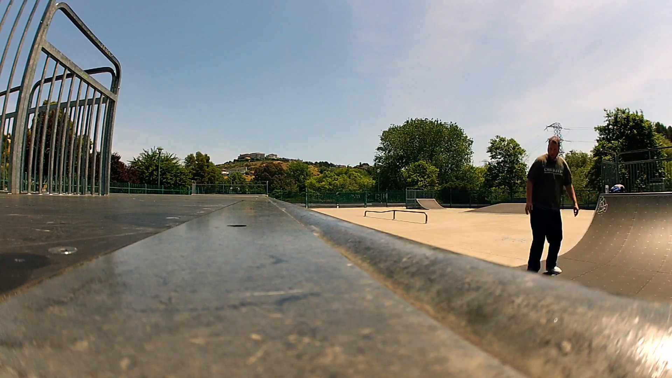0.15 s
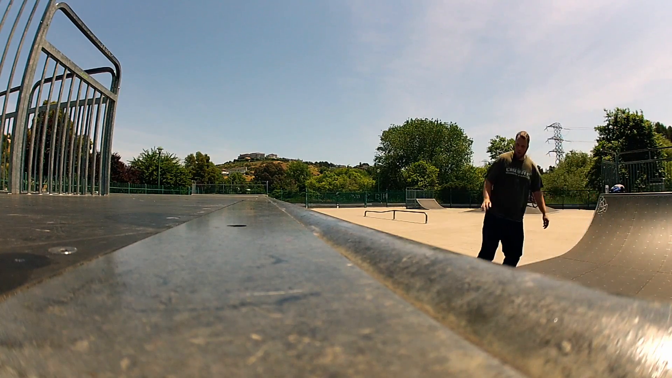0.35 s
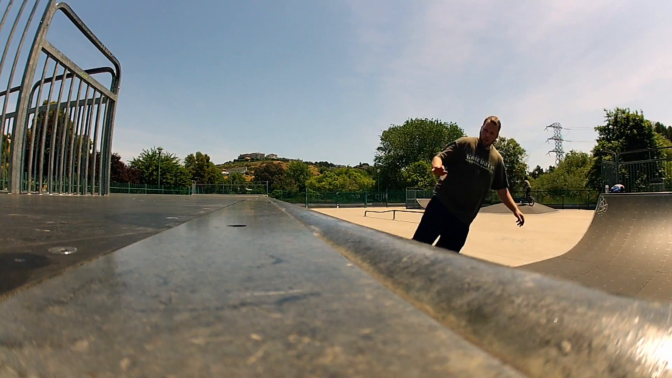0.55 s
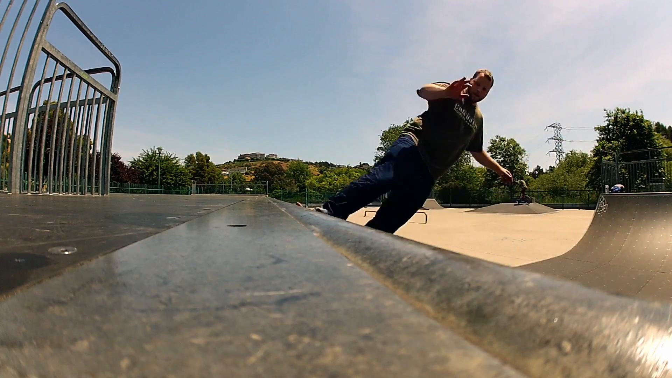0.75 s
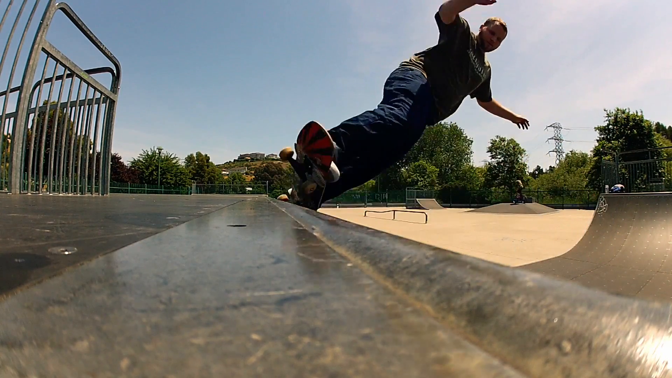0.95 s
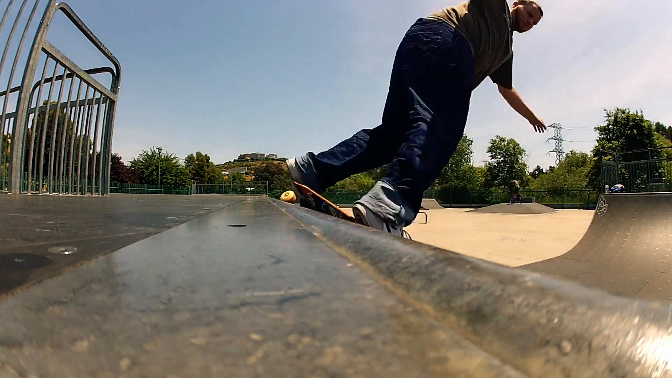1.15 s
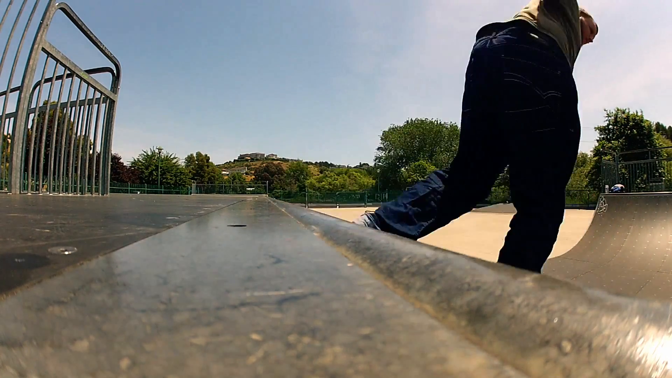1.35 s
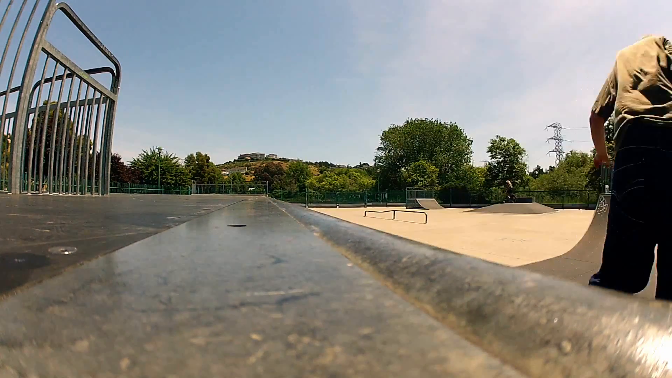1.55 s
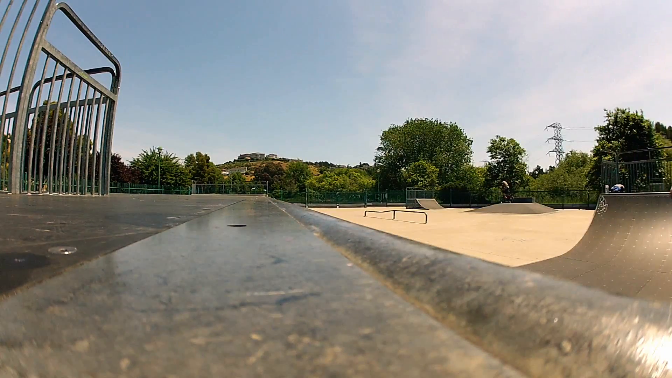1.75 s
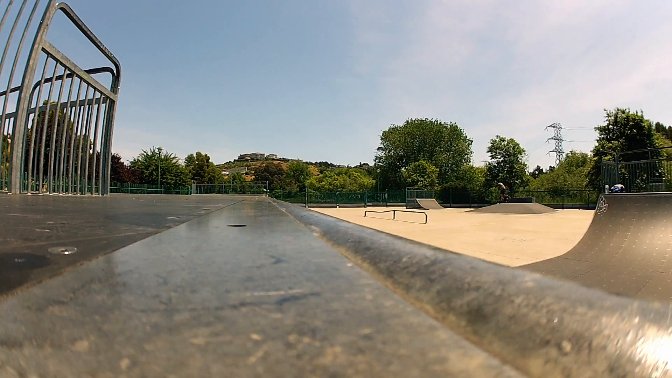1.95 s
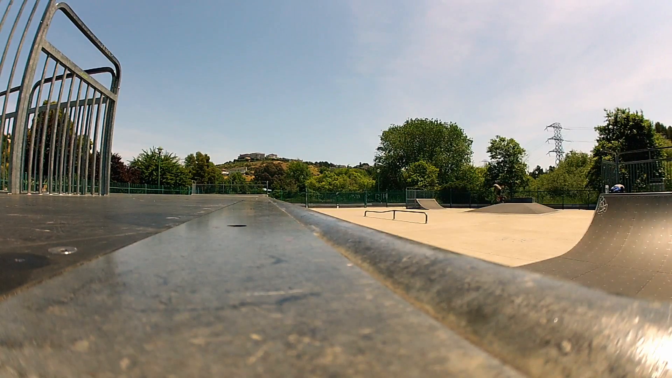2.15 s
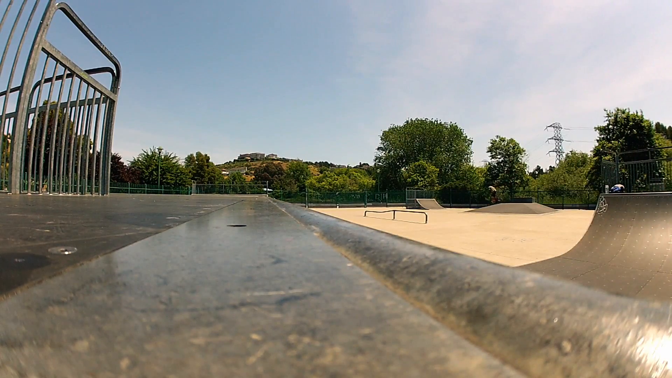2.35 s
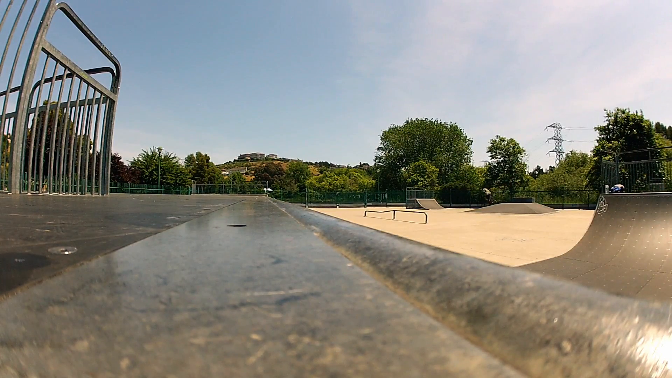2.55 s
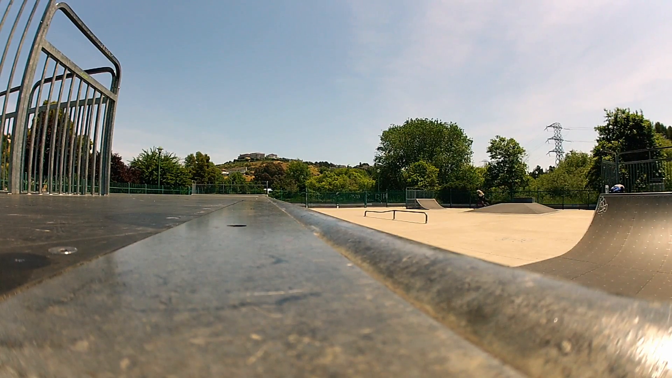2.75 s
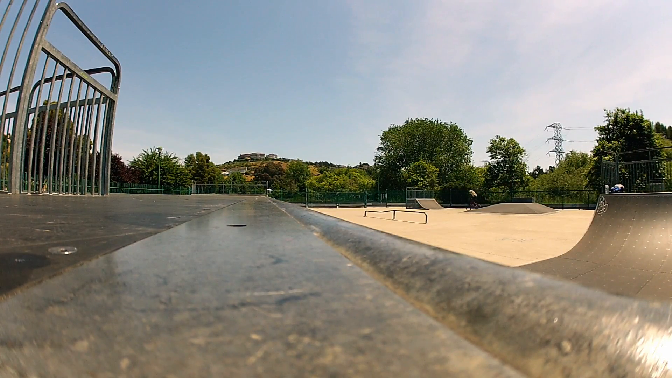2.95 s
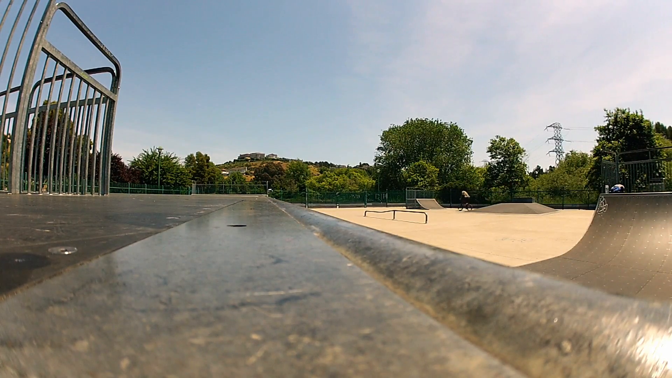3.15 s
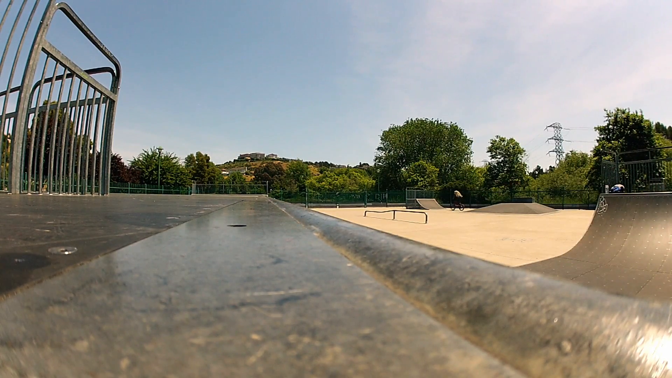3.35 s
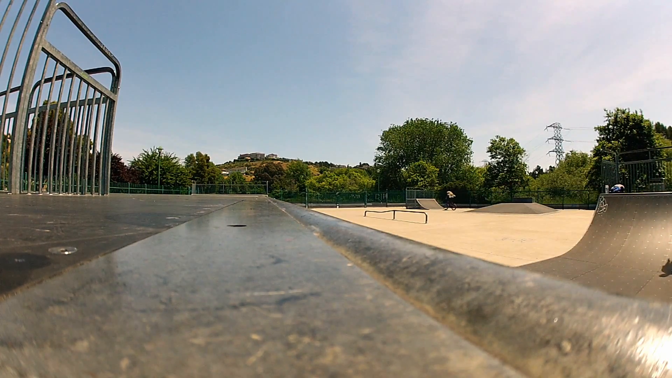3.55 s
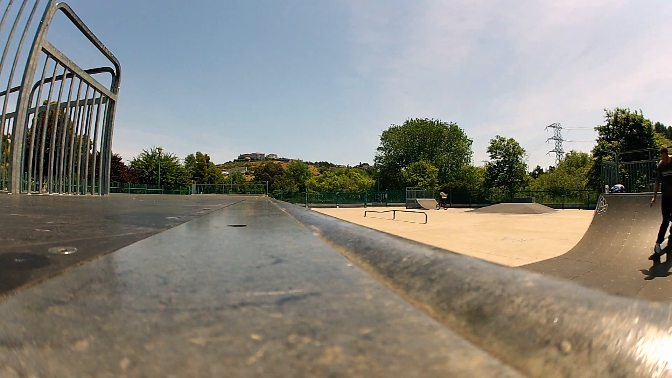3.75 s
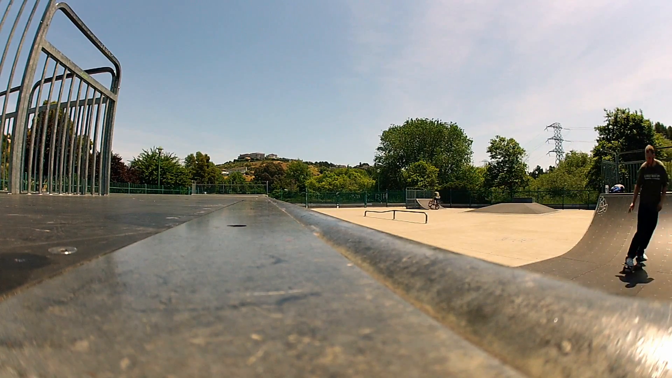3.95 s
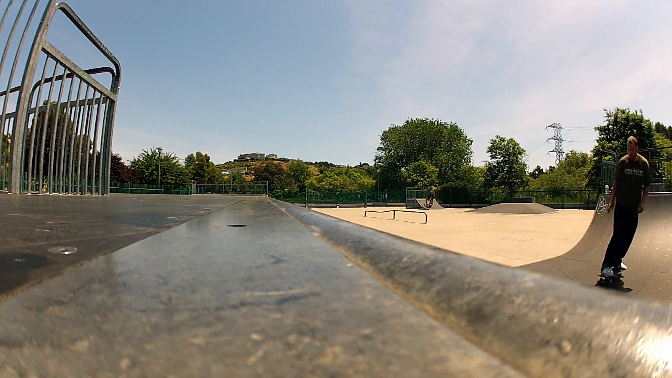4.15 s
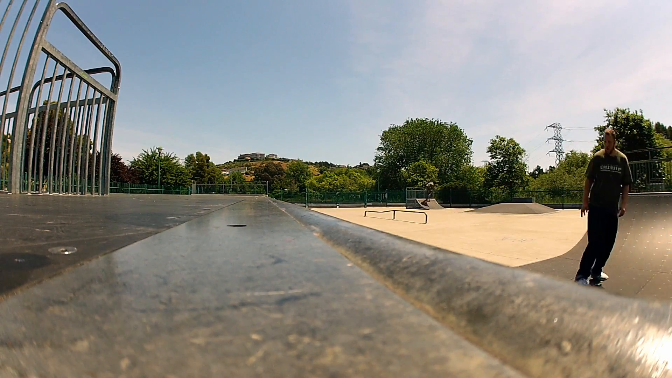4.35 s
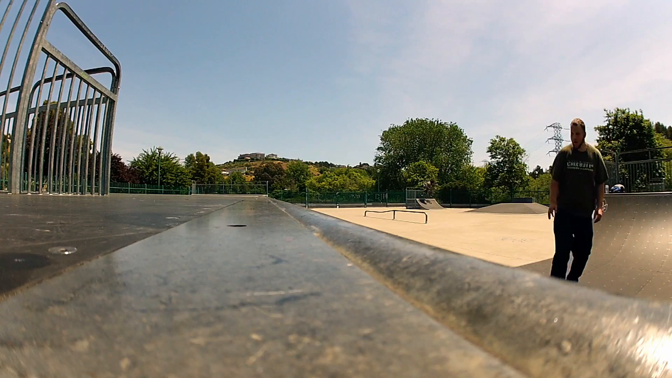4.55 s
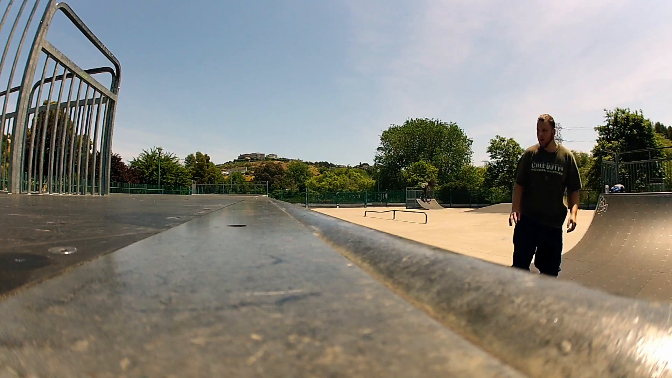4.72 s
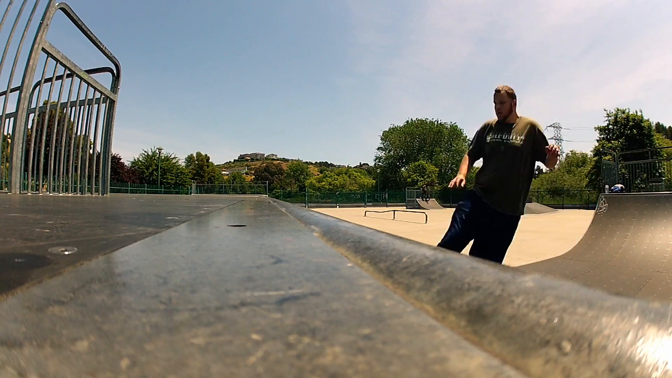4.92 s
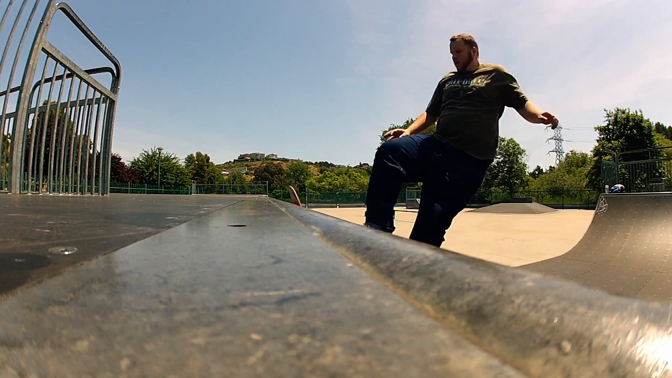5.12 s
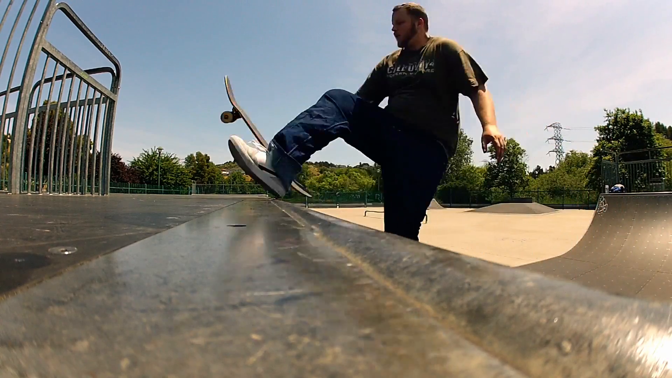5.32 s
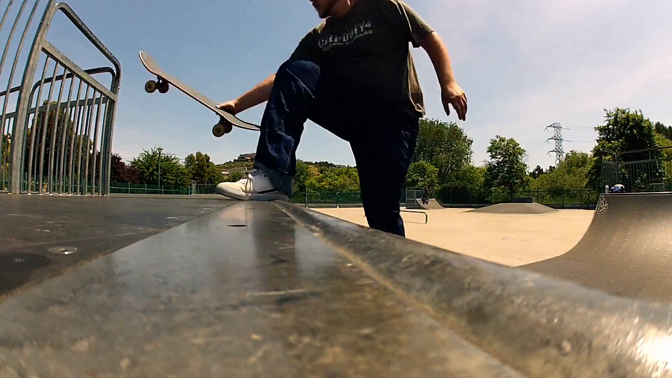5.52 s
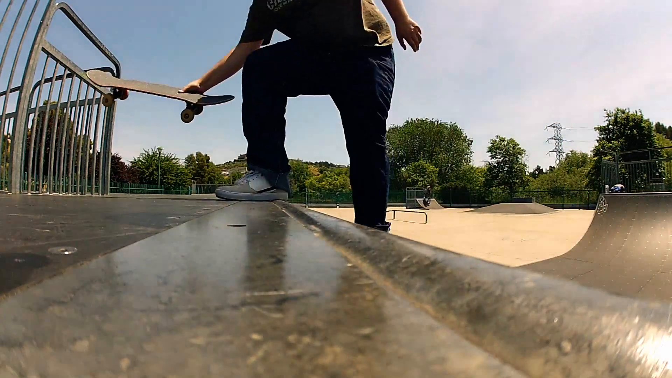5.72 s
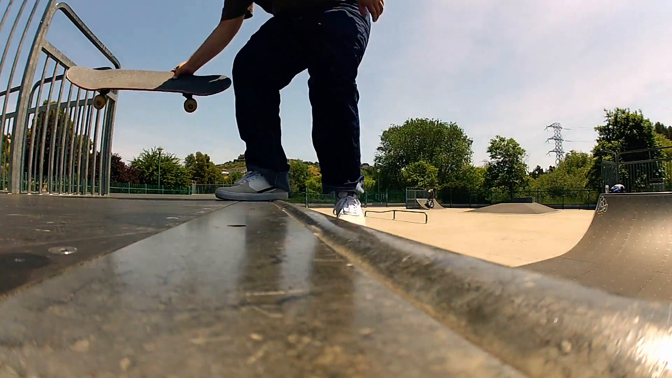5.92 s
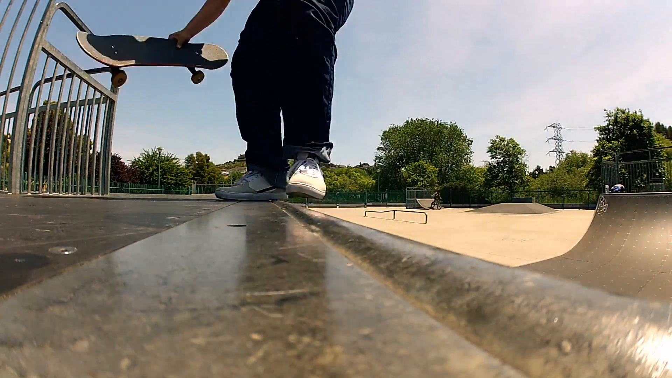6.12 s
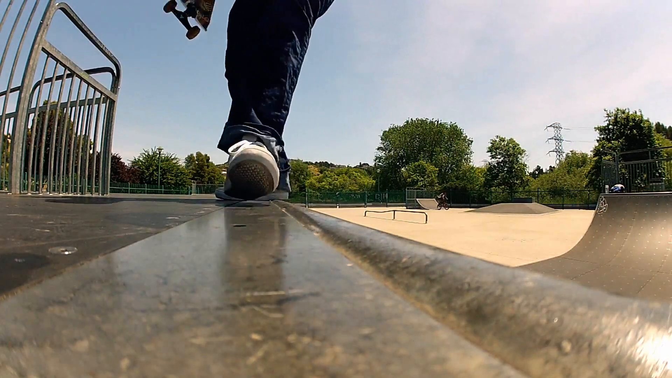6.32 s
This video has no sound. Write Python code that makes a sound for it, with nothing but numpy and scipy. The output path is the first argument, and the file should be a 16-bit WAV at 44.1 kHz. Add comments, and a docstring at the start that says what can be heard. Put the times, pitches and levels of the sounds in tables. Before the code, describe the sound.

A skateboard on hollow ramps outdoors, heard from a microphone lying on the platform, so the panels boom and loud blows distort dully. Wheels rumble and roar from the start; two sharp clacks hit at 0.5-0.6 s, then a cluster of deep thuds around 0.7-0.9. The coping turn brings grinding scuffs and rapid wooden judder near 1.0-1.2, followed by deck knocks and a hollow stamp at 1.3-1.4. The roll away swells at 1.6-1.8, with seam clacks near 2.0, 2.7 and 3.0, thinning to faint grit and small clacks by 3.4. From 3.8 the rumble returns, with clacks near 4.1 and a bright steel-edged pair at 4.8-4.9. At 5.25 the tail cracks and squeaks; heavy stamps and a wooden judder run to 5.5. Softer steps at 5.7 and 5.9 and sole scrapes at 6.2 remain over low open-air murmur.

```python
"""Skateboard on hollow park ramps

The microphone lies on a ramp's platform outdoors; the board passes close by, rolls off to 7 m and returns.
Shaped noise and wandering resonances make the rolling: panels drum and boom, wheels roar, grit hisses.
Decaying modes and noise bursts make the blows: clacks at seams, knocks of the deck, stamps on the platform.
Friction tones mark the slides and turns on the steel coping. The recorder overloads and holds its samples
at a low rate."""
import sys
import numpy as np
from scipy import signal
from scipy.fft import rfft, irfft, next_fast_len
from scipy.io import wavfile

SR = 44100
rng = np.random.default_rng(int(sys.argv[2]) if len(sys.argv) > 2 else 0)


def dump_mix(stems):
    """Bounce the given channels to the path in sys.argv[1] as a 16-bit WAV at rate SR."""
    frames = np.atleast_2d(stems).T  # one column per channel
    limited = np.clip(frames, -1, 1)  # hard clip at full scale
    pcm = np.round(limited * 32767).astype(np.int16)
    wavfile.write(sys.argv[1], SR, pcm)


N = 281161
TIME = np.arange(N) / SR
AGE = TIME[:SR // 2]   # time since a blow

# how hard the wheels roll (speed and load) on three rides: (time [s], level [dB])
RIDE_UP = [(0, -35), (0.2, -41), (0.45, -39), (0.72, -37), (0.88, -40), (1.02, -47.5), (1.27, -53.5)]
# the second ride: (time [s], level [dB])
RIDE_AWAY = [(1.33, -42.5), (1.8, -34), (2.1, -40), (2.42, -42), (2.68, -38.5), (2.92, -47), (3.08, -45.5),
             (3.25, -57.5)]
# the third ride: (time [s], level [dB])
RIDE_BACK = [(3.55, -57.5), (3.85, -42), (4.15, -38.5), (4.45, -43), (4.56, -39.5), (4.78, -44.5),
             (4.87, -38.5), (5.1, -42.5), (5.21, -46)]
# from the board to the microphone: (time [s], distance [m])
DISTANCE = [(0, 4.06), (0.55, 2.2), (1.2, 2.8), (1.6, 2.3), (2.0, 2.1), (2.7, 5.8), (3.85, 7), (4.55, 2.7),
            (5.1, 1.9), (5.6, 1.4), (6.38, 1.2)]
# the rider presses into the curve of a ramp and the panel booms:
# (time [s], level [dB], half length [s], pitch [Hz])
PUMPS = [(0.04, -33, 0.057, 185), (0.78, -41, 0.089, 105), (0.705, -34, 0.0081, 280),
         (0.805, -43, 0.037, 154.8), (0.875, -37, 0.038, 230), (1.62, -34.5, 0.08, 195),
         (1.715, -30, 0.013, 205), (2.645, -36, 0.014, 128.5), (2.76, -41, 0.093, 185),
         (3.07, -44, 0.11, 169.4), (3.45, -41, 0.042, 125), (4.695, -39, 0.069, 180),
         (5.065, -42.5, 0.043, 384)]
# wheels or soles slide sideways, levels at the microphone:
# (time [s], half length [s], grind level [dB], hiss level [dB])
SLIDES = [(0.7, 0.018, -54, -87), (0.96, 0.13, -61, -76), (1.13, 0.082, -59.5, -83),
          (1.71, 0.054, -66, -68), (2.822, 0.1, -72, -74.5), (3.04, 0.048, -67, -71.5),
          (3.27, .045, -87, -78.5), (3.396, 0.042, -73, -68), (3.548, 0.022, -76, -71.5),
          (3.674, 0.05, -74, -74), (3.823, 0.042, -86, -69), (4.02, 0.095, -62, -80),
          (4.448, 0.21, -85, -75.5), (5.085, 0.02, -53, -71), (5.527, 0.051, -59.5, -74),
          (5.635, 0.02, -66, -70), (6.192, 0.12, -66.5, -82.5)]
# an axle crosses a panel seam, front and rear in turn: (time [s], thud level [dB], thud pitch [Hz],
# thud t60 [s], snap level [dB], clatter level [dB], clatter t60 [s], crunch of grit level [dB])
SEAMS = [(0.5055, -25, 524, 0.031, -20, -36, 0.098, -61), (0.5763, -17, 326, 0.009, -23.5, -28, 0.025, -63),
         (1.944, -32, 670, 0.008, -33, -32.5, 0.074, -65), (2.029, -30, 370, 0.055, -33, -37, 0.062, -55),
         (2.62, -30.5, 434, 0.022, -53, -47, 0.04, -57), (2.699, -21.5, 322, 0.046, -55, -45, .04, -57),
         (2.979, -26, 177, 0.061, -45, -45.5, 0.039, -56), (3.082, -32, 251, 0.046, -52, -46, 0.059, -64),
         (3.38, -33, 283, 0.027, -30, -40, 0.031, -60), (3.406, -26.5, 263, 0.015, -40, -43, 0.038, -55),
         (4.058, -28.5, 405, 0.053, -41, -39, 0.074, -57),
         (4.149, -45, 442, 0.019, -32.5, -34.5, 0.065, -58),
         (4.8215, -25, 362, 0.074, -40, -30.5, 0.032, -58),
         (4.9111, -21, 380, 0.017, -22.5, -28, 0.027, -52)]
# a wheel drops into a dent of the panel: (time [s], thud level [dB], thud pitch [Hz], thud t60 [s])
DENTS = [(0.513, -40, 327, 0.026), (0.696, -31, 284, 0.052), (0.704, -26, 320, 0.034),
         (0.721, -26.5, 377, 0.025), (0.753, -22.5, 196, 0.038), (0.872, -35, 232, 0.12),
         (1.568, -27, 210, 0.032), (1.707, -26.5, 221, 0.075), (1.757, -39, 594, 0.02),
         (1.796, -32, 323, 0.035), (2.146, -30.5, 345, 0.04), (2.641, -26, 340, 0.04),
         (2.648, -27, 198, 0.021), (2.774, -28, 208, 0.065), (2.967, -41.5, 542, 0.08),
         (3.824, -40, 565, 0.035), (3.902, -39, 605, 0.017), (3.975, -37.5, 615, 0.019),
         (4.299, -31, 328, 0.041)]
# a grain of grit is crushed under a wheel: (time [s], level [dB])
GRIT_POPS = [(1.188, -68), (1.495, -60), (1.64, -52.5), (1.907, -53), (2.935, -53), (2.963, -53),
             (3.025, -59), (3.447, -57), (3.474, -72), (4.029, -66), (5.6, -59.5), (5.757, -69),
             (6.152, -69), (6.186, -74)]
# axles tap the loose steel edge of the last seam: (time [s], reference level of its sounds [dB])
STEEL_TAPS = [(4.821, -39), (4.9113, -37)]
# the board lands on its wheels or knocks its tail: (time [s], thud level [dB], thud pitch [Hz],
# snap level [dB], wood crack level [dB], deck ring level [dB], deck mode [Hz])
KNOCKS = [(1.187, -56, 302, -53, -47, -35.5, 995), (1.3102, -26, 450, -54, -36, -32.5, 1400),
          (1.358, -27.5, 320, -52, -38, -38.5, 1500), (1.39, -21, 326, -24.5, -37.5, -31, 890),
          (5.223, -41, 328, -50, -43, -43, 960), (5.229, -33, 337, -54, -47, -43, 1150),
          (5.246, -26.5, 504, -44, -35, -50, 1200), (5.405, -26, 298, -42, -31, -34.5, 1440)]
# the deck slips over the coping in quick series: (time [s], level [dB], mean gap between slips [s],
# loss per slip [dB], middling pitch [Hz])
JUDDERS = [(1.051, -51, 0.0016, -0.5, 1700), (1.077, -43.5, 0.0021, 0, 1330), (1.152, -46, 0.0018, 4, 1500),
           (1.16, -40, 0.0014, 1.5, 1370), (5.4055, -23.5, .0019, 4.5, 1140)]
# trucks, wheels and tail scuff the coping:
# (time [s], rub level [dB], length [s], ring pitch [Hz], ring level [dB])
SCUFFS = [(0.868, -38, 0.016, 3404, -48.5), (0.955, -34, 0.011, 2680, -51), (1.062, -58, 0.02, 4850, -67),
          (1.11, -55.5, 0.059, 2170, -63), (1.151, -57.5, 0.02, 4830, -63), (1.225, -56, 0.033, 4800, -68),
          (1.37, -62, 0.027, 4380, -65), (2.959, -57, 0.016, 1400, -61), (5.244, -34, 0.0089, 4850, -53),
          (5.264, -41, 0.013, 5230, -52), (5.402, -44, 0.012, 2680, -58)]
# the tail squeaks as it drags on the steel, its pitch following the pressure:
# (time [s], level [dB], length [s], start pitch [Hz], end pitch [Hz], octave against the tone [dB])
SQUEAKS = [(5.263, -51.5, 0.031, 2350, 2880, -0.5), (5.405, -53.5, 0.024, 2730, 2620, -16)]
# feet on the hollow platform: (time [s], level [dB], time for the sole to take the weight [s])
STAMPS = [(1.392, -20, 0.00072), (5.247, -16.5, 0.00049), (5.29, -21, 0.0081), (5.336, -23, 0.0098),
          (5.384, -18.5, 0.0084), (5.464, -24, 0.0077), (5.7, -37.5, 0.0082), (5.889, -45, .005)]
# a sole shifts on the platform: (time [s], level [dB])
SHUFFLES = [(5.451, -46), (5.475, -47), (5.533, -49), (5.628, -55), (6.157, -54.5), (6.223, -62),
            (6.254, -56.5)]

# modes of a ramp panel: (pitch [Hz], relative level [dB], t60 [s])
PANEL = [(145, -6, 0.071), (205, -12, 0.049), (338, -6, 0.16), (467, -20, 0.12), (592, -10.5, 0.069)]
# modes of the hollow platform: (pitch [Hz], relative level [dB], t60 [s])
PLATFORM = [(119.9, -20, 0.77), (149.4, -7, 0.097), (283.4, -10.5, 0.086), (400, -19, 0.06)]
# modes of the loose steel edge: (pitch [Hz], relative level [dB], t60 [s])
STEEL = [(3350, 34, 0.0089), (3510, 32, 0.018), (3660, 18, 0.0066), (4320, 14, .006)]

# spectrum of the drumming panels: (frequency [Hz], relative density [dB per Hz])
DRUM = [(20, -28), (45, -37), (65, -20), (100, -3), (150, -4), (195, -2.5), (235, -3), (300, -13.5),
        (500, -46)]
# spectrum of the wheels' roar: (frequency [Hz], relative density [dB per Hz])
ROAR = [(130, -8), (230, -4.5), (275, -2), (335, 1), (420, -3), (580, -11), (800, -23.5), (1200, -52),
        (2000, -59)]
# spectrum of wheels or soles grinding on the surface: (frequency [Hz], relative density [dB per Hz])
GRIND = [(400, -12), (750, 1), (1000, 2), (1350, -1.5), (1900, -9.5), (2500, -21), (3500, -25)]
# spectrum of loose grit hissing: (frequency [Hz], relative density [dB per Hz])
GRIT = [(1200, -35.5), (2300, -2.5), (2900, 3), (3600, 0.5), (4500, -1), (5600, 4)]
# spectrum of grit crushed under a wheel: (frequency [Hz], relative density [dB per Hz])
CRUNCH = [(1200, -8), (2400, -1.5), (3600, 2), (4600, -2), (5500, -10)]
# spectrum of clattering trucks and slapping soles: (frequency [Hz], relative density [dB per Hz])
CLACK = [(250, 0.5), (550, 15.5), (900, 7.5), (1200, 9), (2000, 1), (2800, -12), (4000, -17), (5500, -32.5)]
# spectrum of the loose steel edge rattling: (frequency [Hz], relative density [dB per Hz])
RATTLE = [(1500, -1), (2600, -1.5), (3500, 14), (4300, 0), (5200, -18)]
# spectrum of the wooden deck cracking: (frequency [Hz], relative density [dB per Hz])
WOOD = [(250, 4), (650, 17), (900, 10), (1400, 6), (1750, 3.5), (2200, -4.5), (2800, -26), (3500, -16),
        (4700, -9.5), (5600, -6.5)]
# spectrum of rubbing on the steel coping: (frequency [Hz], relative density [dB per Hz])
COPING = [(400, -4), (1000, -8), (1600, 7), (2200, 4), (2700, -5), (3400, -2), (4300, 0), (5150, -4.5),
          (5800, 12.5)]
# spectrum of the open air around: (frequency [Hz], relative density [dB per Hz])
PARK = [(20, -6), (60, 3), (110, 6), (160, 7), (240, -18.5), (450, -18), (1000, -28), (2000, -32.5),
        (3000, -47), (5500, -47.5)]

CRUISE_DB = -41.5   # a ride at ordinary speed
KICK_S, SPIN_DOWN_DB_PER_S = 5.24, 22   # the board is kicked up and its wheels run down
# carried by the ramp, alike at any distance: levels at cruise
DRUM_DB, BOOM_DB, ROAR_DB, DECK_DB = -44, -44.5, -44, -51
DRUM_FOLLOWS = 0.65   # share of the ride's swing in dB that drumming and boom follow
# carried by the air, falling with distance: levels at cruise from 1 m
GRIND_DB, GRIT_DB, RATTLES_DB = -53, -72, -60.5
RATTLES_PER_S = 35
BOOM_HZ, BOOM_HZ_PER_DB = 181.15, 1   # the panel's boom rises with speed
BOOM_WANDER_HZ = 9   # and wanders as the wheels move over the panel
PUMP_DRUM_DB = -7   # broad drumming against the boom of a press
STIFF_S, STIFF_HALF_S, STIFF_DB = 4.23, 0.6, -4.5   # the way back starts over stiffer panels, which drum less
DECK_HZ, DECK_WANDER_HZ = 333.2, 16   # the deck's hum shifts as the rider's weight moves
SURGE_DB, SURGES_PER_S = 1.97, 13   # rough and smooth patches pass under the wheels
PITS_PER_S, PITS_DB, PIT_T60_S = 290, -54.5, 0.024   # level at cruise
PIT_LOW_HZ, PIT_HIGH_HZ = 425, 727
GRIT_FLUTTER_DB = 2.0
PANEL_RING_DB = -21   # the panel's other modes, against the thud
SHUDDER_DB, SHUDDER_FOLLOWS, SHUDDER_T60_S = -38.5, 0.38, 0.32   # level for a 0 dB thud; dB per dB of thud
CRUNCH_T60_S = 0.017
REBOUND_S, REBOUND_DB = .0035, 1.5   # second tap of the steel edge, against its reference level
KNOCK_T60_S, KNOCK_THUD_T60_S, DECK_RING_T60_S = 0.063, 0.025, 0.023
SLIP_T60_S = 0.0093
SCUFF_GRAINS_PER_S = 4300   # catches of a sliding surface
PIPE_RING_DB, PIPE_T60_S, PIPE_WIDTH_HZ = -19, 0.35, 500   # level against the ring
PARK_DB = -50.5
OVERLOAD = .0895   # clipping point, full scale 1
BASS_CUT_HZ, ANTI_ALIAS_HZ, HOLD_HZ, CUTOFF_HZ = 47, 5500, 12000, 15300


def from_db(db):
    """Decibels to gain."""
    return 10 ** (np.asarray(db) / 20)


def rms_one(x):
    """Scale to unit rms."""
    return x / np.sqrt(np.mean(x ** 2) + 1e-20)


def decay(t60):
    """Exponential fade by 60 dB in t60 seconds."""
    return np.exp(-np.log(1000) * AGE / t60)


def coloured(x, spectrum):
    """Give a steady excitation a spectrum; rms 1."""
    size = next_fast_len(len(x))
    hz, db = np.transpose(spectrum)
    grid = np.maximum(np.fft.rfftfreq(size, 1 / SR), 1)
    gain = from_db(np.interp(np.log(grid), np.log(hz), db))
    skirts = np.minimum(grid / hz[0], 1) ** 2 * np.minimum(hz[-1] / grid, 1) ** 2
    return rms_one(irfft(rfft(x, size) * gain * skirts, size)[:len(x)])


def drift(rate):
    """Random wander with unit rms, heading for a new value rate times a second."""
    knots = rng.standard_normal(N // 100)
    return rms_one(np.interp(TIME * rate, np.arange(len(knots)), knots))


def bumps(per_s, spread_db):
    """Random little impacts of uneven size, as a wheel meets the grain of the surface."""
    sizes = from_db(spread_db * np.minimum(rng.exponential(1, N), 4))
    return (rng.random(N) < per_s / SR) * sizes * rng.standard_normal(N)


def swelled(level_db, swells):
    """A level in dB with bell-shaped swells (time [s], level [dB], half length [s]) added in power."""
    power = from_db(level_db) ** 2
    for s, peak_db, half in swells:
        bell = 1 / np.cosh(np.clip((TIME - s) / half, -20, 20))
        power = power + (from_db(peak_db) * bell) ** 2
    return 10 * np.log10(power)


def singing(hz, width_hz, size):
    """A resonance kept going by random pushes: a tone whose strength and phase wander; rms 1."""
    r = np.exp(-np.pi * width_hz / SR)
    pushes = rng.standard_normal(size) + 1j * rng.standard_normal(size)
    wander = signal.lfilter([1], [1, -2 * r, r * r], pushes)
    phase = 2 * np.pi * np.cumsum(hz * np.ones(size)) / SR
    return rms_one((wander * np.exp(1j * phase)).real)


def struck(modes):
    """One blow on a body, with a softened onset and mode levels that vary each time; peak 1."""
    hz, db, t60 = np.transpose(modes)[:, :, None]
    db = db + 1.5 * rng.standard_normal(db.shape)
    ring = np.sum(from_db(db) * decay(t60) * np.sin(2 * np.pi * hz * AGE), axis=0)
    ring = ring * (1 - np.exp(-AGE / 0.0003))
    return ring / np.abs(ring).max()


def crack(spectrum, t60, tail_db, tail_t60):
    """Dense short modes of a contact build up, the faster the drier; the ramps around add a faint tail."""
    build = 1 - np.exp(-AGE / (0.073 * t60))
    fade = decay(t60) + from_db(tail_db) * decay(tail_t60)
    return coloured(rng.standard_normal(len(AGE)), spectrum) * build * fade


def tick(hz, t60):
    """One damped swing; with a very short decay it is the first hard touch of a wheel."""
    return decay(t60) * np.sin(2 * np.pi * hz * AGE)


def add(track, s, sound):
    """Mix a sound into a track at time s."""
    start = round(s * SR)
    part = sound[max(-start, 0):max(len(track) - start, 0)]
    track[max(start, 0):max(start, 0) + len(part)] += part


def rolling():
    """Bumps drive ramp and wheels; a fluttering wheel load shakes roar, grind and grit together."""
    effort_db, load = effort(), drift(rate=55)
    surging_db = effort_db + SURGE_DB * drift(rate=SURGES_PER_S)
    distance = np.interp(TIME, *np.transpose(DISTANCE))
    airborne_db = effort_db - 20 * np.log10(distance)
    grind_db = swelled(GRIND_DB + airborne_db, [(s, db, half) for s, half, db, _ in SLIDES])
    grit_db = swelled(GRIT_DB + airborne_db, [(s, db, half) for s, half, _, db in SLIDES])
    deck_hz = DECK_HZ + DECK_WANDER_HZ * drift(rate=5)
    deck = from_db(DECK_DB + effort_db) * singing(deck_hz, width_hz=62, size=N)
    grind = from_db(grind_db + 0.43 * load) * coloured(bumps(per_s=4000, spread_db=-1.0), GRIND)
    roar = roaring(ROAR_DB + surging_db + 0.29 * load)
    pits = pitted(PITS_DB + 1.04 * surging_db)
    grit = gritty(grit_db + GRIT_FLUTTER_DB * load)
    return drumming(effort_db) + deck + grind + roar + pits + grit + rattling(RATTLES_DB + airborne_db)


def effort():
    """How hard the wheels roll, in dB above cruise: three rides, then the run-down after the kick."""
    ride_db = np.interp(TIME, *np.transpose([*RIDE_UP, *RIDE_AWAY, *RIDE_BACK]))
    return ride_db - CRUISE_DB - SPIN_DOWN_DB_PER_S * np.maximum(TIME - KICK_S, 0)


def drumming(effort_db):
    """The hollow ramp drums and booms under the wheels, more where the rider presses into its curve."""
    drive_db = DRUM_FOLLOWS * effort_db + STIFF_DB * np.exp(-((TIME - STIFF_S) / STIFF_HALF_S) ** 2)
    presses = [(s, db + PUMP_DRUM_DB, half) for s, db, half, _ in PUMPS]
    drum_db = swelled(DRUM_DB + drive_db, presses)
    out = from_db(drum_db) * coloured(rng.standard_normal(N), DRUM)
    boom_hz = BOOM_HZ + BOOM_HZ_PER_DB * effort_db + BOOM_WANDER_HZ * drift(rate=9)
    out += from_db(BOOM_DB + drive_db) * singing(boom_hz, width_hz=79, size=N)
    around = TIME[:SR] - .5   # time from the peak of a press
    for s, db, half, hz in PUMPS:
        swell = np.exp(-(around / half) ** 2 / 2)
        add(out, s + around[0], from_db(db) * swell * singing(hz, width_hz=50, size=len(around)))
    return out


def roaring(level_db):
    """Faster wheels roar louder and also brighter, as the bumps strike them more briefly."""
    roar = coloured(bumps(per_s=2200, spread_db=0.0), ROAR)
    low = signal.sosfiltfilt(signal.butter(2, 430, fs=SR, output="sos"), roar)
    speed_db = np.clip(level_db + 43, -18, 6)
    return from_db(level_db) * (low + from_db(0.39 * speed_db) * (roar - low))


def pitted(level_db):
    """Pits give the roar its grain: short knocks, each at the pitch of its spot on the panel."""
    pitches = np.geomspace(PIT_LOW_HZ, PIT_HIGH_HZ, 6)
    pits = np.zeros(N)
    for hz in pitches:
        hits = bumps(PITS_PER_S / len(pitches), spread_db=0.5)
        pits += signal.oaconvolve(hits, tick(hz, PIT_T60_S))[:N]
    softened = signal.sosfilt(signal.butter(2, [330, 800], "band", fs=SR, output="sos"), pits)
    return from_db(level_db) * rms_one(softened)


def gritty(level_db):
    """Loose grit hisses under the wheels; its colour shifts as they meet new ground."""
    hiss = coloured(bumps(per_s=11000, spread_db=2.5), GRIT)
    out = np.zeros(N)
    edges = np.geomspace(1800, 6400, 7)
    for low, high in zip(edges, edges[1:]):
        band = signal.sosfilt(signal.butter(2, [low, high], "band", fs=SR, output="sos"), hiss)
        out += band * from_db(2.0 * drift(rate=22))
        hiss = np.roll(hiss, SR // 7)   # each band hears other grains
    return from_db(level_db) * rms_one(out)


def rattling(level_db):
    """Bumps shake the trucks, which tick in their play now and then."""
    clack = crack(CLACK, t60=0.029, tail_db=-7.5, tail_t60=.12)
    ticks = signal.fftconvolve(bumps(RATTLES_PER_S, spread_db=0.5), clack)[:N]
    return from_db(level_db) * rms_one(ticks)


def seams():
    """Each axle in turn clacks over a seam; a dent only thuds, a grain only crunches."""
    out = np.zeros(N)
    for s, *blow in SEAMS:
        add(out, s, axle(*blow))
    for s, thud_db, hz, t60 in DENTS:
        add(out, s, from_db(thud_db) * thud(hz, t60))
    for s, level_db in GRIT_POPS:
        add(out, s, from_db(level_db) * crunch())
    return out


def axle(thud_db, thud_hz, thud_t60, snap_db, clatter_db, clatter_t60, crunch_db):
    """An axle drops; high bending waves outrun low ones, so crunch and snap precede thud and shudder."""
    out = np.zeros(len(AGE) + SR // 10)
    add(out, 0, from_db(crunch_db) * crunch())
    add(out, .001, from_db(snap_db) * tick(hz=1870, t60=0.0014))
    add(out, .001, from_db(clatter_db) * crack(CLACK, clatter_t60, tail_db=-20.5, tail_t60=0.28))
    add(out, .0026, from_db(thud_db) * thud(thud_hz, thud_t60) + shudder(thud_db))
    return out


def thud(hz, t60):
    """The panel gives in a few heavy swings, at a pitch set by the spot; its other modes ring on."""
    swing = tick(hz, t60) * (1 - np.exp(-AGE / 0.00067))
    return swing / np.abs(swing).max() + from_db(PANEL_RING_DB) * struck(PANEL)


def shudder(thud_db):
    """The ramp's frame takes up a blow slowly and rumbles on, lower than its panels."""
    envelope = (1 - np.exp(-AGE / 0.0077)) * decay(SHUDDER_T60_S)
    level = from_db(SHUDDER_DB + SHUDDER_FOLLOWS * thud_db)
    return level * envelope * singing(hz=114.5, width_hz=22, size=len(AGE))


def crunch():
    """Grit cracks under a wheel: a brief, broad burst with no pitch."""
    return crack(CRUNCH, CRUNCH_T60_S, tail_db=-22, tail_t60=0.34)


def steel_edge():
    """The loose steel edge pings, rattles and taps a second time."""
    out = np.zeros(N)
    for s, tap_db in STEEL_TAPS:
        add(out, s, from_db(tap_db + 5.5) * struck(STEEL))
        add(out, s + REBOUND_S, from_db(tap_db + REBOUND_DB) * struck(STEEL))
        add(out, s, from_db(tap_db + 9.5) * crack(RATTLE, t60=0.012, tail_db=-37, tail_t60=0.64))
    return out


def knocks():
    """The deck snaps, cracks and rings at a mode set by where it is hit; the panel under it thuds."""
    out = np.zeros(N)
    for s, thud_db, thud_hz, snap_db, crack_db, ring_db, mode_hz in KNOCKS:
        add(out, s, from_db(snap_db) * tick(hz=1490, t60=0.0066))
        add(out, s, from_db(crack_db) * crack(WOOD, KNOCK_T60_S, tail_db=-12, tail_t60=0.22))
        add(out, s + 0.00039, from_db(ring_db) * struck([(mode_hz, 0, DECK_RING_T60_S)]))
        add(out, s + 0.00068, from_db(thud_db) * thud(thud_hz, KNOCK_THUD_T60_S))
    return out


def stamps():
    """The rider's weight booms in the platform and slaps it; a slow foot swells in more softly."""
    out = np.zeros(N)
    for s, level_db, contact in STAMPS:
        slap = from_db(-32.5) * crack(CLACK, t60=0.17, tail_db=-13, tail_t60=0.93)
        weight = 1 - np.exp(-(AGE / contact) ** 2)
        add(out, s, from_db(level_db) * weight * (struck(PLATFORM) + slap))
    return out


def judder():
    """The deck sticks and slips across the coping; each slip knocks it once, at a slightly different pitch."""
    out = np.zeros(N)
    for start, level_db, gap, loss_db, hz in JUDDERS:
        for k in range(6):
            s = start + gap * (k + rng.uniform(-0.12, .2))
            slip = tick(hz * rng.uniform(0.77, 1.14), SLIP_T60_S)
            add(out, s, from_db(level_db - loss_db * k) * slip)
    return out


def scuffs():
    """Friction on the steel pipe swells fast, sets a resonance singing and trails off in rub and ring."""
    out = np.zeros(N)
    for s, rub_db, length, ring_hz, ring_db in SCUFFS:
        slide = AGE / length
        grip = 1 - np.exp(-AGE / 0.0038)
        stroke = np.exp(-slide ** 2)
        trail = from_db(-18.0) * np.exp(-slide / 7.7)
        chatter = from_db(2.0 * drift(rate=87)[:len(AGE)])
        catches = (rng.random(len(AGE)) < SCUFF_GRAINS_PER_S / SR) * rng.standard_normal(len(AGE))
        rub = from_db(rub_db) * chatter * coloured(catches, COPING)
        ring = from_db(ring_db) * singing(ring_hz, width_hz=340, size=len(AGE))
        pipe = from_db(ring_db + PIPE_RING_DB) * singing(ring_hz, PIPE_WIDTH_HZ, size=len(AGE))
        pipe = decay(PIPE_T60_S) * pipe
        add(out, s, grip * (stroke * (rub + ring) + trail * rub + pipe))
    return out


def squeaks():
    """Wood sticks and slips on steel fast enough to give a short, rough, gliding tone and its octave."""
    out = np.zeros(N)
    for s, level_db, length, start_hz, end_hz, octave_db in SQUEAKS:
        progress = np.minimum(AGE / length, 1)
        hz = start_hz + (end_hz - start_hz) * progress
        tone = singing(hz, width_hz=170, size=len(AGE))
        octave = from_db(octave_db) * singing(2 * hz, width_hz=540, size=len(AGE))
        add(out, s, from_db(level_db) * np.sin(np.pi * progress) * (tone + octave))
    return out


def shuffles():
    """The rider's soles scrape briefly as he finds his footing."""
    out = np.zeros(N)
    for s, level_db in SHUFFLES:
        add(out, s, from_db(level_db) * crack(GRIND, t60=0.058, tail_db=-19, tail_t60=0.24))
    return out


def park():
    """The low murmur of the open air: steady noise, strongest in the bass."""
    return from_db(PARK_DB) * coloured(rng.standard_normal(N), PARK)


def scene():
    """Board and rider over the murmur of the park, on one channel."""
    board = rolling() + seams() + steel_edge() + knocks() + judder() + scuffs() + squeaks()
    rider = stamps() + shuffles()
    return (board + rider + park())[None]


def record(dry):
    """A low-rate converter clips and holds each sample, mirroring the sound around its rate as a thin sizzle."""
    faded_in = dry * np.minimum(TIME / .004, 1)
    band = signal.sosfiltfilt(signal.butter(12, ANTI_ALIAS_HZ, fs=SR, output="sos"), faded_in)
    band = signal.sosfilt(signal.butter(2, BASS_CUT_HZ, "high", fs=SR, output="sos"), band)
    samples = np.clip(signal.resample_poly(band, HOLD_HZ, SR, axis=1), -OVERLOAD, OVERLOAD)
    steps = np.repeat(samples, 4, axis=1)   # each sample is held
    held = signal.resample_poly(steps, SR, 4 * HOLD_HZ, axis=1)[:, :N]
    return signal.sosfilt(signal.ellip(10, .1, 80, CUTOFF_HZ, fs=SR, output="sos"), held)


dry = scene()
out = record(dry)
dump_mix(out)
```